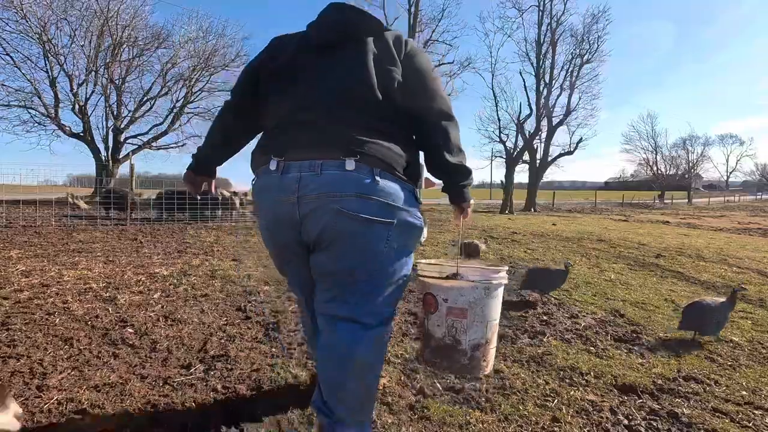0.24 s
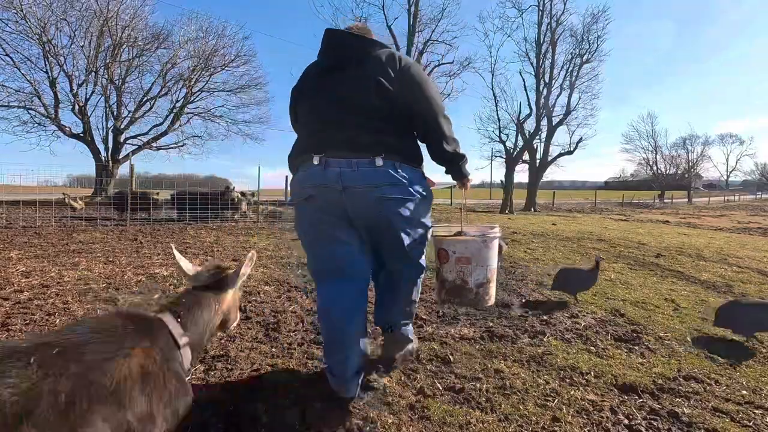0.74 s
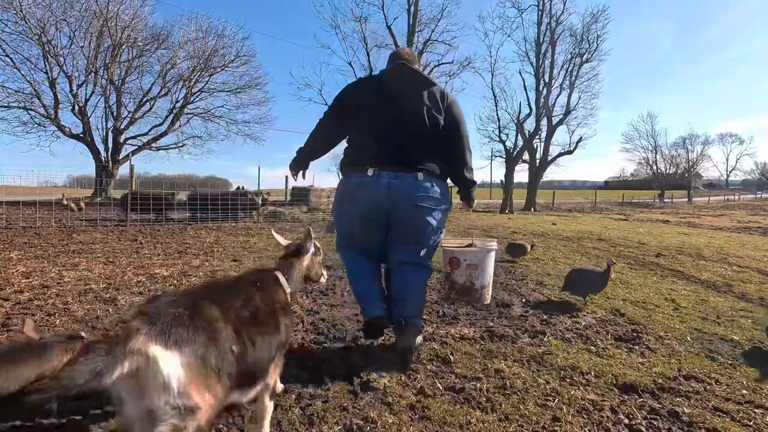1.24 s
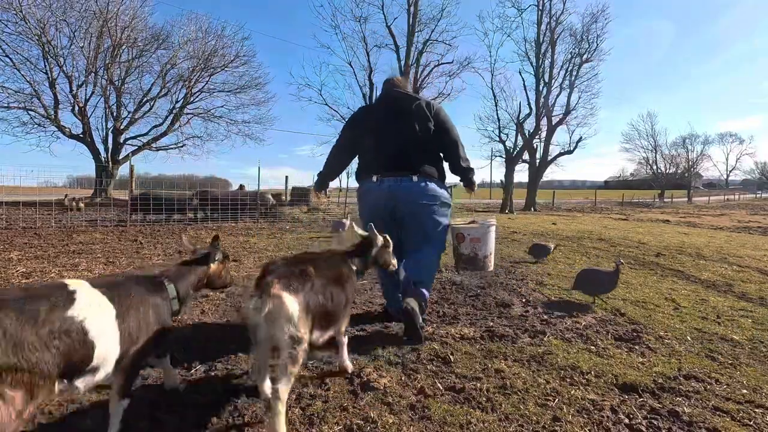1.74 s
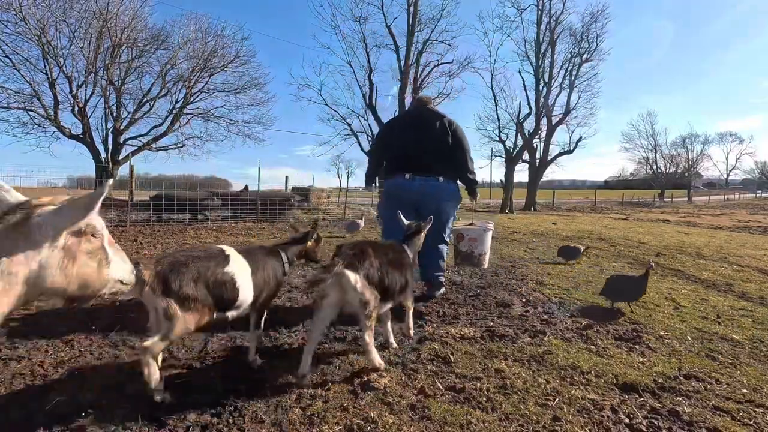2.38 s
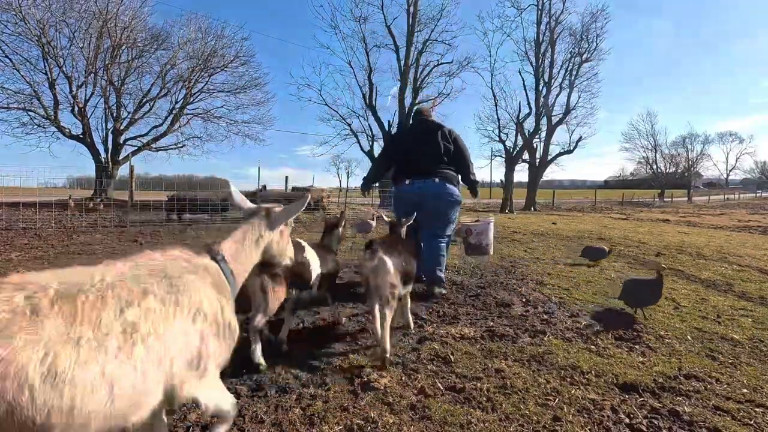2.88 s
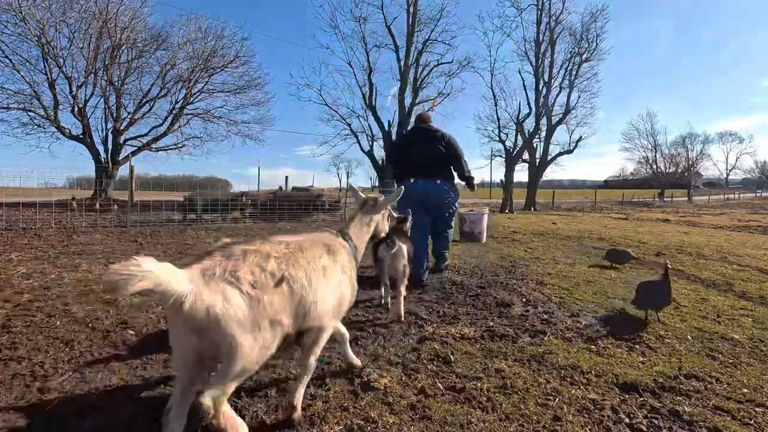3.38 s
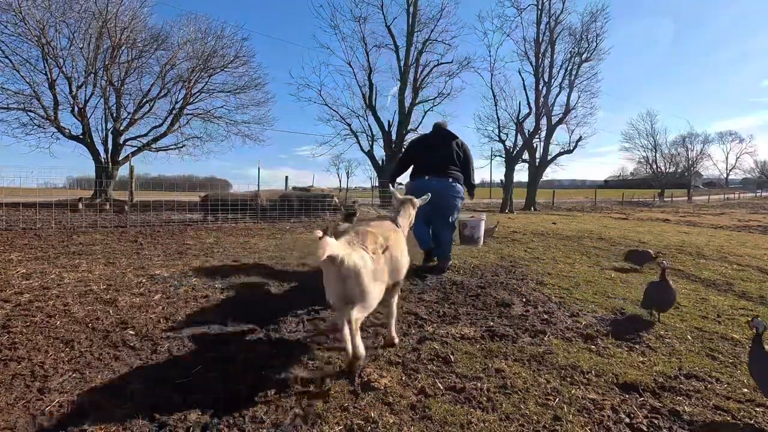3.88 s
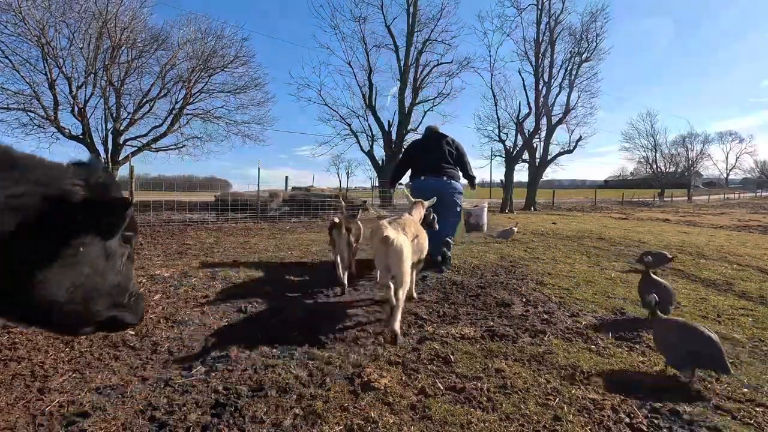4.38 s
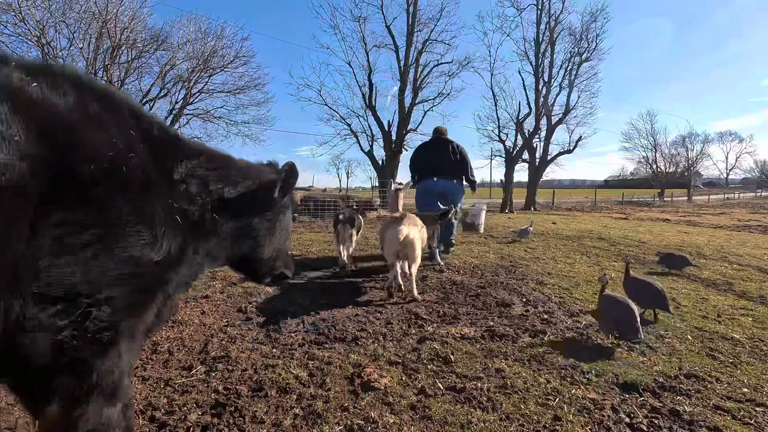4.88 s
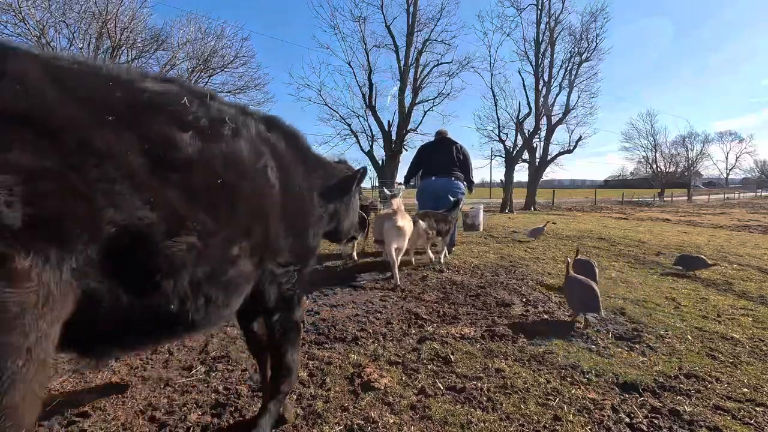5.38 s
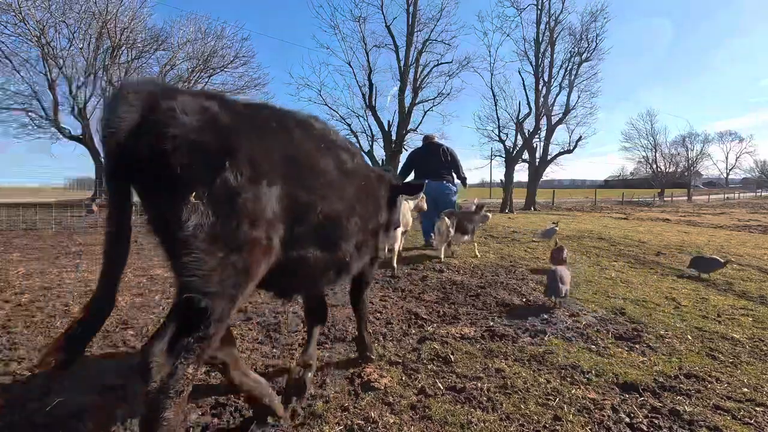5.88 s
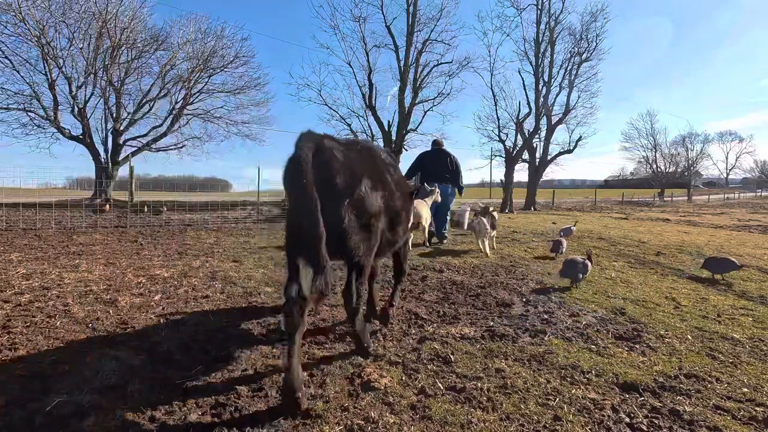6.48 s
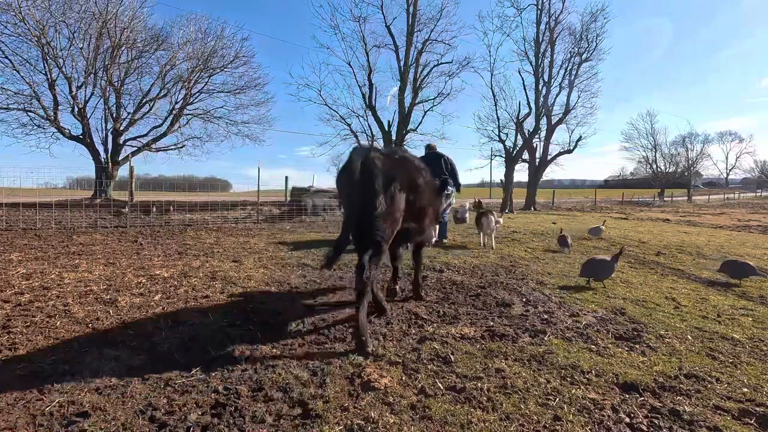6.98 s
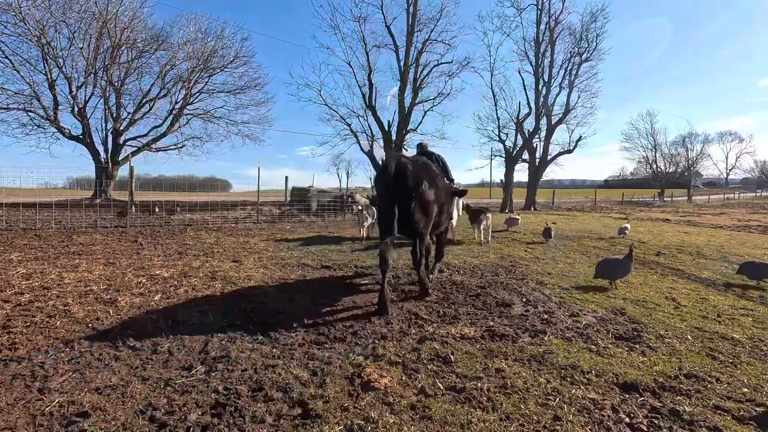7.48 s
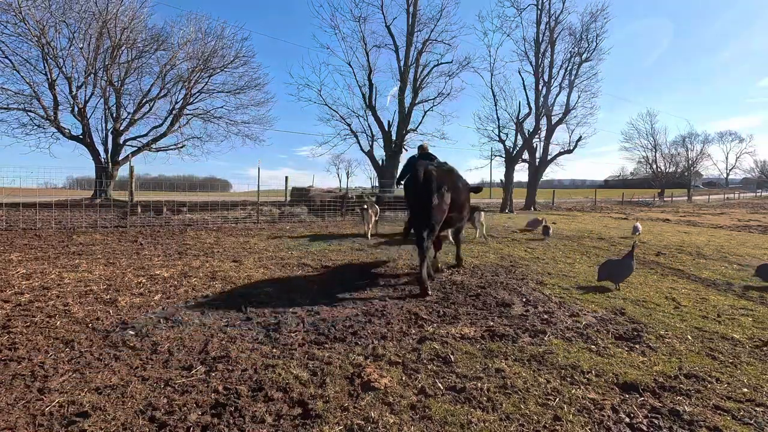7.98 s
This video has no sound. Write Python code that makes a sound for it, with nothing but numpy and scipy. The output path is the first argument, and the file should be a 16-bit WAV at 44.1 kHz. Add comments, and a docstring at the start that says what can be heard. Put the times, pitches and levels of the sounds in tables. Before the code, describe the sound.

Guinea fowl call over and over in an open pasture, clucks, rising whistles and harsh squawks, with wind rumbling on the microphone and hooves clicking.

```python
"""An open pasture where guinea fowl call: a short cluck, then a whistle that breaks into a squawk.
Whistles are nearly pure tones; squawks and clucks are rough pulses ringing through windpipe, beak and throat.
The end of a goat's bleat opens the scene. Hooves click on dry clods and something rattles like a bucket handle.
Filtered noise makes the wind on the microphone and a background wash; steady tones make a motor's hum."""
import sys
import numpy as np
from scipy import signal
from scipy.fft import rfft, irfft, next_fast_len
from scipy.io import wavfile
from scipy.ndimage import uniform_filter1d

SR = 44100
rng = np.random.default_rng(int(sys.argv[2]) if len(sys.argv) > 2 else 0)


def transcribe(u):
    """Save the signal u as a 16-bit wav file named by the first command-line argument.

    u: samples, shape (n,) or (channels, n), limited to [-1, 1]; the rate is SR.
    q: integer samples, one column per channel.
    """
    v = np.clip(np.atleast_2d(u).T, -1, 1)
    q = np.round(v * 32767).astype(np.int16)
    wavfile.write(sys.argv[1], SR, q)


N = 363384  # samples in the scene

# Whistles: start t/s, rise t/s, whole length t/s, level/dB, first f/Hz (after the sharp start), last f/Hz,
# overtones at the start level/dB
WHISTLES = [(.41, 0.029, 0.088, -17.5, 1640, 1835, -2.5), (0.886, 0.017, 0.043, -28.5, 1333, 1690, 16),
            (1.068, 0.037, 0.077, -14, 1620, 1835, -0.5), (1.682, 0.04, 0.04, -17.5, 1583, 1850, 2.5),
            (2.347, 0.054, 0.1, -20, 1620, 1900, 3.5), (3.013, 0.02, .032, -33.5, 1603, 1580, 6),
            (3.48, .045, .065, -19.5, 1640, 1863, 2), (4.158, 0.032, 0.072, -18, 1644, 1822, -3.5),
            (4.869, 0.031, 0.074, -17, 1598, 1755, -3), (5.529, 0.03, 0.053, -17, 1598, 1676, -2),
            (6.221, 0.012, .035, -34, 1567, 1530, 3), (6.284, 0.04, 0.085, -21.5, 1640, 1764, -2),
            (6.985, 0.033, .1, -17, 1600, 1810, -4), (7.722, 0.017, 0.073, -25.5, 1600, 1830, 2),
            (1.929, 0.018, 0.031, -38.5, 1592, 1600, 6), (8.101, 0.0073, .04, -33, 1573, 1580, 3)]
# Whistle overtones: multiple of the pitch, relative level/dB
WHISTLE_OVERTONES = [(2, -17.5), (3, -19), (4, -34), (5, -40), (6, -31)]
SHARP_START = 0.04  # the pitch starts sharp by this share
PITCH_BEND = 2.09  # power of the climb: the pitch holds, then climbs
WHISTLE_END_S = 0.012  # the tone breaks off

# Squawks: start t/s, rise t/s, hold t/s, fall t/s, effort level/dB, windpipe at the end level/dB,
# beak level/dB, pulse rate at mid-call f/Hz, beak ring at mid-call f/Hz, mouth ring at mid-call f/Hz,
# upward glide as the beak opens (share), mouth at the end level/dB, treble tilt (dB per octave)
SQUAWKS = [(.47, 0.034, 0.017, 0.021, -45.5, 17.5, 15.3, 342, 1820, 3105, 0.086, 5.5, 5),
           (.72, 0.017, 0.063, .04, -51.5, 5, 3.6, 374, 1600, 2700, 0.017, 3, -6),
           (0.551, .02, 0.13, 0.0406, -57, -16, 19.5, 358.5, 1780, 3237, 0.23, 6, -17),
           (0.878, 0.034, 0.034, 0.1, -40.5, 2, 4.5, 365, 1450, 2880, 0.035, 5, -2),
           (1.111, 0.037, 0.032, 0.054, -33.5, -4, 10.8, 358.2, 1730, 3580, 0.042, 3.5, 2),
           (1.602, 0.12, 0.012, 0.018, -44, -5, 11.4, 336, 1500, 3070, 0.091, 4, 2),
           (1.708, 0.027, 0.045, 0.065, -35, -14, 14.2, 333.7, 1686, 3300, 0.081, 6.5, 4),
           (1.929, 0.019, .1, 0.052, -53, -19, 14.7, 330.2, 1510, 5050, 0.097, -22, 3),
           (2.412, 0.017, 0.028, 0.074, -37.5, 2, 17.3, 338.4, 1820, 3200, 0.093, 6, 7.5),
           (3.03, 0.14, 0.088, 0.056, -41, -27, 8.8, 325.4, 1610, 3400, 0.11, 3, -6),
           (3.509, 0.021, 0.045, 0.039, -39, 5.5, 17.4, 344, 1804, 3220, 0.13, 7, 5),
           (3.9, 0.072, 0.094, .02, -40.5, -6, 7, 335, 1690, 3350, 0.098, 9.5, -8),
           (4.072, 0.016, 0.14, 0.013, -49, -4, 13.2, 350, 1600, 3260, 0.093, -10, -2),
           (4.189, 0.024, 0.046, 0.032, -36, 0.5, 14.5, 349, 1700, 2550, 0.032, 0, 2),
           (4.65, 0.021, 0.16, 0.047, -43, -15, 10, 336, 1627, 3240, 0.12, 5.5, -8),
           (4.915, 0.006, 0.046, 0.08, -38.5, 10.5, 14, 350.2, 1760, 3040, 0.045, 4, -1),
           (5.238, 0.025, 0.093, 0.067, -51, -1, 15.7, 332.6, 1560, 5160, 0.074, -3, 6),
           (5.43, 0.098, 0.052, 0.016, -43, -2, 10.3, 329.3, 1640, 3200, 0.069, 8, 2),
           (5.568, 0.017, 0.061, 0.069, -35.5, 4, 13.5, 355, 1750, 3770, 0.03, 3, 1.5),
           (6.228, 0.096, 0.018, 0.01, -42.5, 0, 18.5, 332.4, 1580, 5230, 0.044, -6, 5.5),
           (6.332, 0.0099, 0.06, 0.078, -36.5, 2.5, 14.4, 338.4, 1760, 3600, 0.049, 5, -7),
           (6.883, 0.0077, 0.025, 0.047, -51.5, 12.5, 14, 321.6, 1480, 3500, 0.028, -12.5, -1),
           (6.968, 0.016, 0.11, 0.027, -54.5, -12.5, 17.4, 345.6, 1650, 3550, 0.038, 4, -3),
           (7.047, 0.018, 0.046, 0.075, -39.5, 9.5, 13.6, 352.4, 1730, 2880, .03, 1, -0.5),
           (7.132, 0.013, 0.082, 0.061, -49.5, 3, 16, 341.4, 1720, 4540, 0.15, -17, 2.5),
           (7.659, 0.095, 0.028, 0.015, -43, -19, 16, 320.3, 1660, 2670, 0.078, 5, 0),
           (7.751, 0.0092, 0.065, 0.11, -36.5, -21, 15, 352, 1710, 3830, 0.086, 2, 5.5),
           (8.106, 0.029, .09, 0.0535, -45, -8, 15, 335.2, 1610, 5400, 0.113, 1, 3.5)]
RISE_DB, FALL_DB = -13, -34  # level at the start and at the end, compared with the hold
PIPE_SWELL_DB, MOUTH_SWELL_DB = 7.5, 5.5  # windpipe and mouth grow this much over a squawk
THROAT_SWEEP = 0.16  # the upper throat and mouth sweep up by this share
MOUTH_FOLLOWS = 0.6  # share of the beak's glide that the mouth adds to its sweep
CHEST_DB = 10.5  # gain of the lowest tone
COARSE_DB, BREATH = 2, 0.88  # uneven grain, and hiss added to the throat and mouth drive
TREBLE_DB = 1.5  # level of throat and mouth together

# Clucks: time t/s, level/dB (before a 2 dB cut), settled windpipe note f/Hz, treble level/dB,
# length t/s (kept within 0.01-0.08)
CLUCKS = [(0.945, -23, 993, -17, 0.024), (0.996, -37.5, 1347, -17, 0.037), (1.573, -25, 1406, -22, 0.017),
          (2.158, -46.5, 1360, -28, 0.088), (2.2306, -22, 1330, -14, 0.015),
          (2.2384, -25.5, 1018, -18, 0.018), (2.288, -42.5, 1420, -9, 0.02), (2.789, -37, 1237, -15, 0.05),
          (2.92, -39, 1360, -13, 0.038), (3.3978, -22.5, 1426, -18.5, 0.037),
          (3.732, -38.5, 1337, -9.5, 0.025), (3.824, -39.5, 1350, -17, 0.03), (4.045, -30, 1388, -10, 0.03),
          (4.477, -42, 1411, -7, 0.035), (4.748, -21, 988, -24.5, 0.019), (5.4025, -20, 1006, -22.5, 0.033),
          (5.985, -33, 1293, -15, 0.05), (6.091, -39.5, 1410, -7, 0.042), (6.146, -18.5, 985, -29, 0.029),
          (6.7923, -38.5, 1417, -11, 0.025), (6.854, -18, 987, -27, 0.032),
          (7.479, -38.5, 1383, -15, 0.037), (7.58, -20, 996, -22, 0.033)]
# Thin notes, most just before a cluck: time t/s, level/dB, nominal pitch f/Hz, length t/s
PIPS = [(0.304, -28, 2744, 0.019), (0.771, -34, 2540, 0.016), (1.554, -39, 2430, 0.026),
        (2.222, -37, 2430, 0.022), (3.143, -32, 4000, 0.013), (3.386, -25.5, 2650, 0.019),
        (4.652, -39.5, 2600, 0.027), (4.662, -38, 3010, 0.015), (4.694, -34, 3830, 0.021),
        (5.396, -42, 2400, 0.01), (6.139, -31.5, 2380, 0.018), (6.844, -37.5, 2430, 0.022),
        (7.569, -44, 2480, 0.01), (8.067, -50, 3170, 0.021)]
# Upper throat rings before the beak's opening shifts them: f/Hz, width f/Hz, level/dB
UPPER_THROAT = [(2525, 110, 3), (3030, 2950, -1), (4006, 250, -2), (4800, 540, -8.5), (6160, 430, -6),
                (7300, 1300, -12.5), (10900, 1700, -25), (12600, 8400, -30)]

# End of the goat's bleat: t/s, level/dB, pitch f/Hz
BLEAT = [(0.0, -32.5, 337), (0.032, -31.5, 381.6), (0.075, -49.5, 328)]
# Tone colour of the goat: f/Hz, gain level/dB
GOAT_COLOUR = [(290, -55), (500, -19), (752, -4.5), (939, -6), (1090, -10.5), (1640, -22), (1830, -16),
               (3810, -13.5), (5670, -24), (8140, -39), (10600, -73), (17900, -120)]

# Hoof clicks: t/s, peak of the bright part level/dB, duller part compared with it level/dB
CLICKS = [(0.7277, -42, -4), (1.0834, -22.5, -18), (1.3117, -34.5, -6), (1.4094, -52, 17),
          (1.5564, -38, -3), (1.79, -35, -17), (1.827, -40, -7), (2.056, -42, -9), (2.9617, -34.5, -7),
          (3.7993, -44.5, 12.5), (4.4817, -51, 13), (4.703, -43, -9), (5.0734, -34, -12),
          (5.3382, -39.5, 17), (5.696, -41, -12), (5.7892, -44, -6), (7.9765, -49, -9)]
# A dry rattle, like a bucket handle: t/s, peak level/dB
TICKS = [(0.5846, -42), (0.607, -34), (0.6299, -33), (0.6541, -31), (0.6818, -27), (0.7097, -30),
         (0.737, -34), (1.3862, -45), (2.5561, -42), (2.579, -38)]

# Wind strength over time: t/s, rumble level/dB
GUSTS = [(0.0, -32), (0.09, -28.5), (0.16, -22), (1.17, -34), (1.7, -22.5), (1.72, -26), (2.34, -24),
         (2.68, -29), (2.73, -24), (2.96, -23), (3.01, -28.5), (3.69, -21), (4.01, -32.5), (4.2, -25.5),
         (4.38, -32), (4.5, -27.5), (5.07, -30.5), (5.99, -22), (6.52, -33.5), (6.84, -21.5), (7.44, -30),
         (7.55, -21.5), (8.22, -26), (8.24, -25)]
# Bursts of flutter, each made slightly earlier and longer: start t/s, length t/s, level/dB
BUFFETS = [(0.17, 0.17, -36.5), (1.084, 0.035, -30), (1.545, 0.21, -29), (1.905, 0.41, -30.5),
           (2.483, 0.029, -35.5), (2.741, 0.15, -26.5), (2.924, 0.051, -40), (3.311, 0.024, -30),
           (3.336, 0.16, -30), (3.527, 0.15, -43), (4.485, 0.052, -35.5), (4.591, 0.092, -33.5),
           (4.888, 0.14, -28), (5.62, 0.043, -38), (5.695, 0.094, -29.5), (5.877, 0.024, -32),
           (5.991, 0.16, -24.5), (6.795, 0.024, -30), (6.9, 0.07, -35), (6.97, 0.2, -29.5),
           (7.333, 0.033, -32), (7.544, 0.06, -28.5), (7.739, 0.23, -29.5)]
# Tone colours of the wind rumble, flutter and slap: f/Hz, relative level/dB
RUMBLE = [(8, -6.5), (20, 5), (45, 0.5), (90, -3), (140, -9), (250, -48.5), (600, -120)]
FLUTTER = [(70, -43.5), (140, 1.5), (220, -5.5), (350, -16.5), (600, -36), (1500, -120)]
SLAP = [(150, -23.5), (300, 1), (550, -9), (900, -19), (1500, -43), (3000, -120)]
FLUTTER_DB, GUSTY_DB = -11, -0.5  # flutter compared with the rumble; random swell of both

# Background wash level over time, swelling around the calls: t/s, level/dB (before a 1 dB lift)
WASH_LEVEL = [(0.0, -58), (0.3, -49), (0.6, -45), (1.24, -51.5), (2.91, -55.5), (3.26, -48.5),
              (3.92, -49.5), (4.13, -42.5), (4.31, -57), (4.68, -58), (4.84, -52), (5.05, -56.5),
              (5.3, -63), (5.42, -47.5), (6.89, -60), (7.04, -43), (7.25, -62.5), (8.24, -57)]
# Tone colour of the background wash: f/Hz, relative level/dB
WASH_COLOUR = [(500, -26.5), (900, 7), (1500, 9), (2200, 2.5), (4500, -7), (7500, -11.5), (8600, -31.5),
               (11000, -34), (14000, -52)]
MOTOR_HZ = 60.15  # base frequency of the motor
# Motor tones: multiple of the base frequency, level/dB
MOTOR_TONES = [(9, -63.5), (10, -63), (11, -63.5), (12, -62), (15, -68), (22, -63.5)]

# Microphone response: f/Hz, gain level/dB
MIC_RESPONSE = [(100, 1), (7000, 0.5), (8600, -12.5), (13000, -7.5), (15000, -34)]
# Tone colour of the microphone hiss: f/Hz, relative level/dB
HISS_COLOUR = [(1000, -23), (2000, -10), (7500, -15), (9000, -21), (13000, -31), (15000, -48.5)]
HISS_DB, EDGE_HZ = -69.5, 15300  # hiss level; top of the band
DIP_S, DIP_WIDTH_S, DIP_DB = 0.075, 0.01, -17  # the level dips briefly


def whistle(start, rise, length, db, first_hz, last_hz, overtones_db):
    """A nearly pure tone whose blurred overtones speak first and fade as it rises."""
    u, before, after = stages(rise, length - rise - WHISTLE_END_S, WHISTLE_END_S)
    hz = first_hz * (1 + SHARP_START * before ** 2) + (last_hz - first_hz) * u ** PITCH_BEND
    turns = np.cumsum(hz * (1 + 0.008 * wander(len(hz), size=150))) / SR
    tone = (1 - before) * np.sin(2 * np.pi * turns)
    fade_db = overtones_db - 20 * u
    for multiple, overtone_db in WHISTLE_OVERTONES:
        blurred_db = overtone_db + fade_db + 2.95 * wander(len(hz), size=60)
        tone += amp(blurred_db) * np.sin(2 * np.pi * multiple * turns)
    level = np.sqrt(2) * amp(db + 2.86 * wander(len(hz), size=200))
    return start, level * tone * (1 - before) ** 0.9 * (1 - after)


def squawk(start, rise, hold, fall, effort_db, pipe_db, beak_db, rate_hz, beak_hz, mouth_hz,
           glide, mouth_db, tilt_db):
    """A membrane pulsing at about a fifth of the whistle's pitch drives windpipe, beak and upper throat."""
    u, before, after = stages(rise, hold, fall)
    from_middle = u - 0.5
    hz = rate_hz * (1 + glide * from_middle)
    beak_hz = beak_hz * (1 + glide * from_middle)
    mouth_hz = mouth_hz * (1 + (THROAT_SWEEP + MOUTH_FOLLOWS * glide) * from_middle)

    # Fainter, farther birds sound more smeared
    rough = np.clip(0.31 - 0.01 * (effort_db + 32), 0.28, 0.44)
    drive = pulses(hz, rough=rough, jitter=0.018, patchy_db=4.5)
    pipe = amp(pipe_db + PIPE_SWELL_DB * (u - 1)) * evened(resonate(drive, 3 * hz, 290))
    pipe += amp(CHEST_DB) * resonate(drive, hz, 150)
    beak = amp(beak_db) * evened(resonate(drive, beak_hz, 602))

    # Uneven pulses and hiss smear the treble
    breathy = drive + BREATH * rng.standard_normal(len(hz))
    breathy = breathy * amp(COARSE_DB * wander(len(hz), size=40))
    opening = beak_hz / 1700 * (1 + THROAT_SWEEP * from_middle)
    upper = throat(breathy, opening, tilt_db)
    mouth = evened(resonate(breathy, mouth_hz, 1100))
    upper = upper + amp(mouth_db + MOUTH_SWELL_DB * (u - 1)) * mouth

    voice = pipe - beak + amp(TREBLE_DB) * evened(upper)
    level = amp(effort_db + RISE_DB * before + FALL_DB * after)
    return start, level * voice * signal.windows.tukey(len(hz), 0.15)


def cluck(s, db, hz, treble_db, length):
    """Pulses ring the windpipe near 3 or 4 times their rate; the beak snaps shut, so its ring drops in pitch."""
    u = np.linspace(0, 1, round(np.clip(length, 0.01, 0.08) * SR))
    note = hz * (1 + 0.12 * np.exp(-u / 0.18))
    drive = pulses(note / np.round(hz / 335), rough=0.33, jitter=0.018, patchy_db=4.0)
    windpipe = evened(resonate(drive, note, 170))
    beak = evened(resonate(drive, 1550 + 900 * np.exp(-u / 0.11), 300))
    treble = throat(drive, 0.928, 0.2 * (db + 10.5))  # louder clucks are brighter
    shape = np.minimum(u / 0.14, 1) * np.minimum((1 - u) / 0.19, 1)
    return s - 0.002, amp(db - 2) * (windpipe + 0.34 * beak + amp(treble_db) * treble) * shape


def pip(s, db, hz, length):
    """A short rising tone with two overtones."""
    u = np.linspace(0, 1, round(np.clip(length, 0.006, 0.05) * SR))
    angle = 2 * np.pi * np.cumsum(hz * (0.98 + 0.022 * u)) / SR
    tone = np.sin(angle) + 0.08 * np.sin(2 * angle) + 0.049 * np.sin(3 * angle)
    return s - 0.003, amp(db) * tone * signal.windows.tukey(len(u), 0.7)


def pulses(hz, rough, jitter, patchy_db):
    """Voice pulses of unsteady rate, each overtone swelling on its own, with a puff of noise each cycle."""
    turns = np.cumsum(hz * (1 + jitter * wander(len(hz), size=200))) / SR
    clean = np.zeros(len(hz))
    for k in range(1, 30):
        swell = amp(patchy_db * wander(len(hz), size=500))
        clean += swell * np.cos(2 * np.pi * (k * turns + 0.55 * rng.random()))
    puffs = (0.43 + np.exp(-(turns % 1) / 0.9)) * rng.standard_normal(len(hz))
    return (1 - rough) * evened(clean) + rough * evened(puffs)


def throat(drive, opening, tilt_db):
    """The upper throat rings, all raised as the beak opens; the tilt lifts or lowers the higher ones."""
    total = np.zeros(len(drive))
    for k, (hz, width, db) in enumerate(UPPER_THROAT):
        gain = (-1) ** k * amp(db + tilt_db * np.log2(hz / 2500))
        total += gain * resonate(drive, hz * opening, width)
    return evened(total)


def stages(rise, hold, fall):
    """Progress 0-1 through a call, and how far each sample is before and after the hold (1 at the ends)."""
    rise, hold, fall = np.maximum([rise, hold, fall], 0.005)
    t = np.arange(0, rise + hold + fall, 1 / SR)
    before = np.clip(1 - t / rise, 0, 1)
    after = np.clip((t - rise - hold) / fall, 0, 1)
    return t / t[-1], before, after


def bleat():
    """The dying end of a nasal bleat: voice pulses coloured by the goat's throat."""
    s, (db, hz) = columns(BLEAT)
    voice = pulses(hz, rough=0.3, jitter=0.01, patchy_db=3.0)
    return s, amp(db) * evened(colour(voice, GOAT_COLOUR))


def click(s, db, dull_db):
    """A clod cracks under a hoof: a quickly dying noise with a bright and a duller ring."""
    t = np.arange(900) / SR
    crack = rng.standard_normal(len(t)) * np.exp(-t / 0.003)
    bright, dull = resonate(crack, 7500, 5200), resonate(crack, 2600, 3000)
    return s, amp(db) * (bright / abs(bright).max() + amp(dull_db) * dull / abs(dull).max())


def tick(s, db):
    """A short dry tap: a quickly dying noise with one ring."""
    t = np.arange(500) / SR
    tap = resonate(rng.standard_normal(len(t)) * np.exp(-t / 0.0026), 3260, 1300)
    return s, amp(db) * tap / abs(tap).max()


def yard(x):
    """Echoes off ground, fences and sheds: sparse taps of random sign, dying away, dull."""
    at = np.arange(300, SR // 2, 22)
    taps = np.zeros(SR // 2 + 22)
    signs = rng.choice([-1., 1.], len(at))
    taps[at + rng.integers(0, 22, len(at))] = signs * amp(-60 * at / SR / 0.28)  # 60 dB down in 0.28 s
    taps = colour(taps, [(300, -21.5), (1500, -2.0), (4000, 1.0), (9000, -8)])
    return signal.fftconvolve(x, taps / np.linalg.norm(taps))[:N]


def wind():
    """Slow rumble and lumpy flutter, as eddies break over the microphone; the strongest lumps slap."""
    gust_db = np.resize(columns(GUSTS)[1][0], N)
    gust = amp(gust_db + GUSTY_DB * wander(N, size=5000))
    eddies = amp(FLUTTER_DB) * gust
    for s, length, db in BUFFETS:
        add(eddies, s - 0.02, amp(db) * np.hanning(round((abs(length) + 0.023) * SR)))
    rumble = evened(colour(rng.standard_normal(N), RUMBLE))
    lumps_db = wander(N, size=600)
    flutter = evened(colour(rng.standard_normal(N) * amp(3.32 * lumps_db), FLUTTER))
    slap = evened(colour(rng.standard_normal(N) * amp(5.87 * lumps_db), SLAP))
    return gust * rumble + eddies * (flutter + amp(-10.5) * slap)


def background():
    """Background wash of noise, patchy in time and pitch, with the motor's wavering hum."""
    z = signal.stft(rng.standard_normal(N + 512), nperseg=512, noverlap=384)[2]
    patches = uniform_filter1d(rng.standard_normal(z.shape), size=12, axis=0)
    patches = evened(uniform_filter1d(patches, size=10, axis=1))
    patchy_db = 3.2 * patches + 1.8 * wander(z.shape[1], size=5)
    wash = signal.istft(z * amp(patchy_db), nperseg=512, noverlap=384)[1][:N]
    t = np.arange(N) / SR
    hum = np.zeros(N)
    for multiple, db in MOTOR_TONES:
        level = amp(db + 0.62 * wander(N, size=20000))
        hum += level * np.sin(2 * np.pi * (multiple * MOTOR_HZ * t + rng.random()))
    wash_level = amp(np.resize(columns(WASH_LEVEL)[1][0], N) + 1.0)
    return wash_level * evened(colour(wash, WASH_COLOUR)) + hum


def amp(db):
    """Gain from dB."""
    return 10 ** (np.asarray(db) / 20)


def evened(x):
    """Scales a sound to an average (rms) strength of 1."""
    return x / np.sqrt(np.mean(x ** 2) + 1e-20)


def add(mix, s, sound):
    """Mixes a sound in at time s, in seconds."""
    part = mix[max(round(s * SR), 0):][:len(sound)]
    part += sound[:len(part)]


def columns(rows):
    """Start time and every column of a curve table, sample by sample."""
    s, *rest = np.transpose(rows)
    t = np.arange(s[0], s[-1], 1 / SR)
    return s[0], [np.interp(t, s, c) for c in rest]


def colour(x, points):
    """Filters a sound by a curve of (f/Hz, gain/dB) points."""
    hz, db = np.transpose(points)
    size = next_fast_len(len(x))
    log_hz = np.log(np.fft.rfftfreq(size, 1 / SR) + 1)
    gain = amp(np.interp(log_hz, np.log(hz), db))
    return irfft(rfft(x, size) * gain, size)[:len(x)]


def resonate(x, hz, width):
    """A ring that can glide: shifts the curve hz down to zero, smooths twice, and shifts back."""
    turn = np.exp(2j * np.pi * np.cumsum(hz * np.ones(len(x))) / SR)
    r = np.exp(-np.pi * width / SR)
    smooth = signal.lfilter([(1 - r) ** 2], [1, -2 * r, r * r], x / turn + 1e-18)
    return 2 * (turn * smooth).real


def wander(length, size):
    """Smooth chance of rms 1, changing over about size samples."""
    noise = rng.standard_normal(length + size)
    return evened(uniform_filter1d(uniform_filter1d(noise, size), size)[:length])


def scene():
    """Birds, goat, clicks and rattle with their echoes, over wind and background."""
    near = np.zeros(N)
    add(near, *bleat())
    sources = ((whistle, WHISTLES), (squawk, SQUAWKS), (cluck, CLUCKS),
               (pip, PIPS), (click, CLICKS), (tick, TICKS))
    for source, table in sources:
        for row in table:
            add(near, *source(*row))
    dip = amp(DIP_DB * np.exp(-((np.arange(N) / SR - DIP_S) / DIP_WIDTH_S) ** 2))
    return (dip * (near + amp(-16.5) * yard(near) + wind() + background()))[None]


def record(dry):
    """Microphone treble roll-off and hiss, soft overload on peaks, then the band limit."""
    hiss = amp(HISS_DB) * evened(colour(rng.standard_normal(N), HISS_COLOUR))
    heard = colour(dry[0], MIC_RESPONSE) + hiss
    ceiling = 0.7
    limited = ceiling * np.tanh(heard / ceiling)[None]
    band_limit = signal.firwin(511, EDGE_HZ, window=("kaiser", 9), fs=SR)[None]
    return signal.oaconvolve(limited, band_limit, "same")


dry = scene()
out = record(dry)
transcribe(out)
```